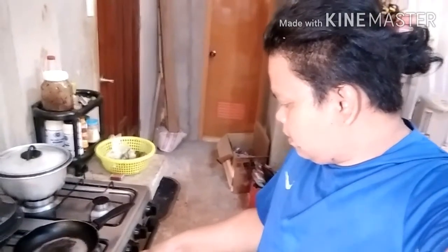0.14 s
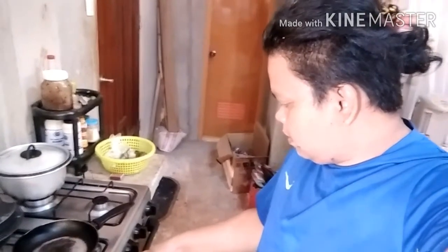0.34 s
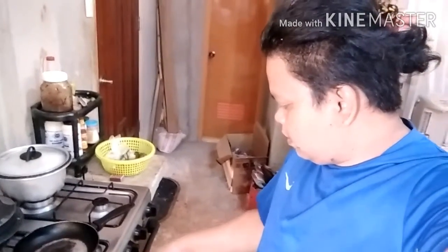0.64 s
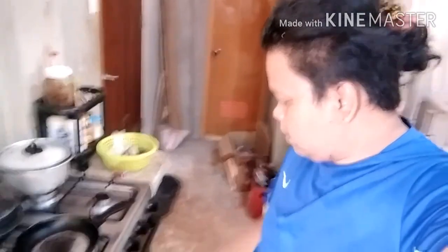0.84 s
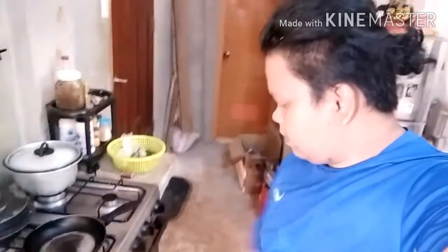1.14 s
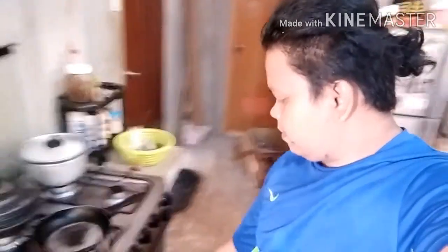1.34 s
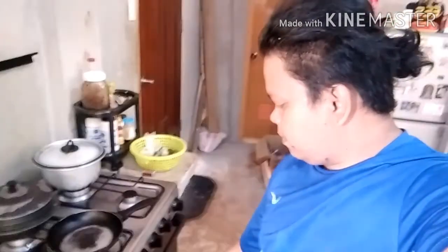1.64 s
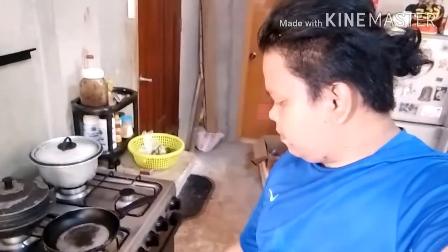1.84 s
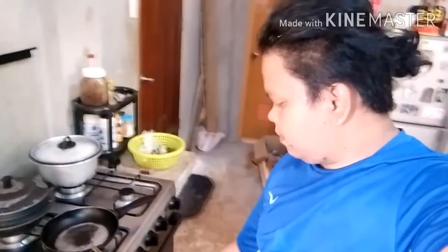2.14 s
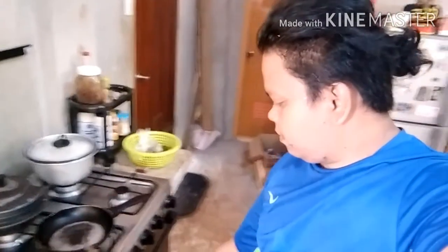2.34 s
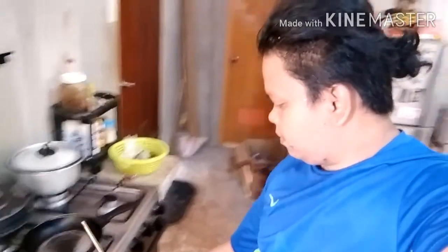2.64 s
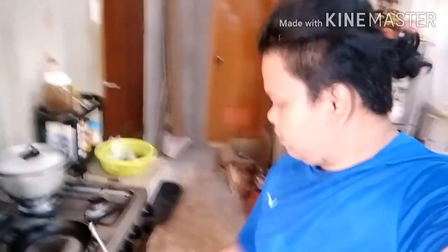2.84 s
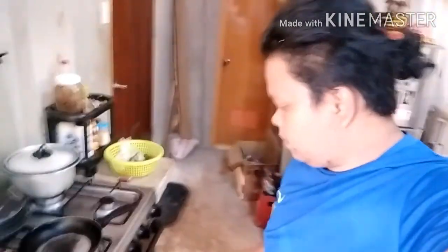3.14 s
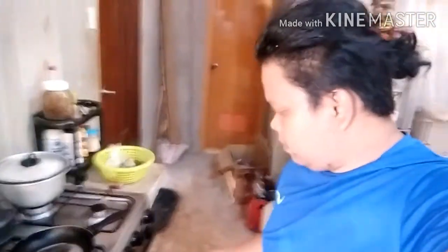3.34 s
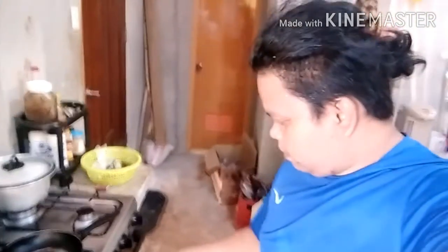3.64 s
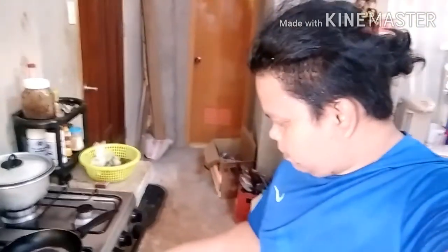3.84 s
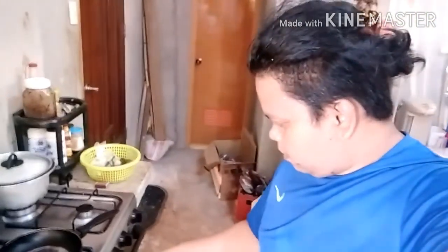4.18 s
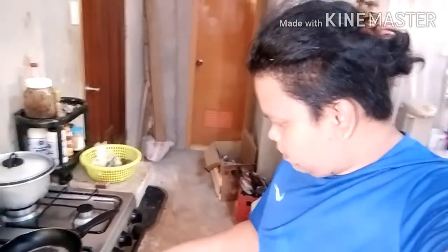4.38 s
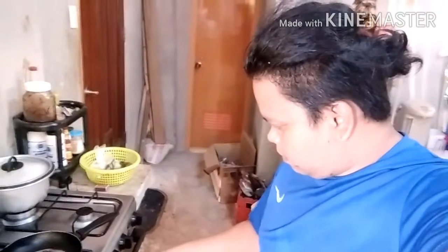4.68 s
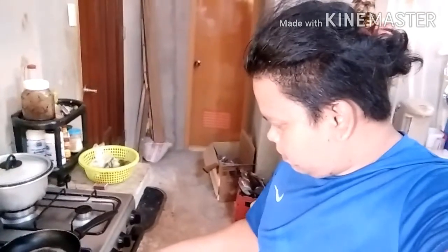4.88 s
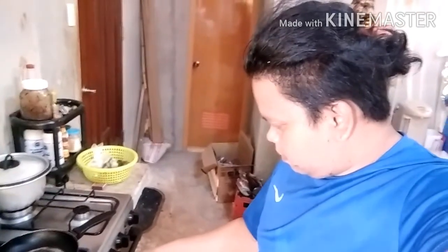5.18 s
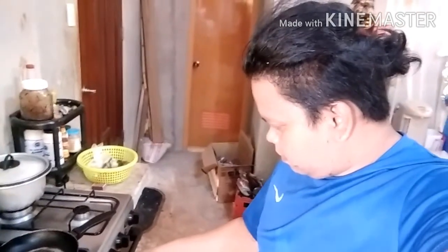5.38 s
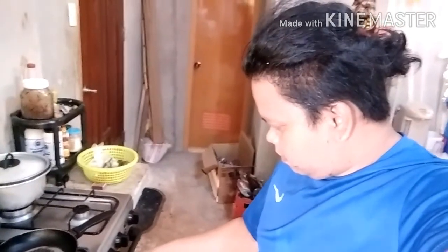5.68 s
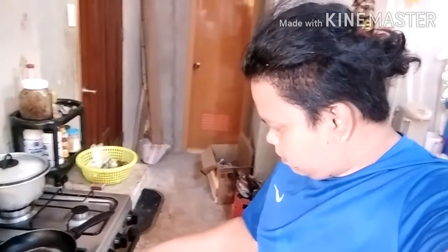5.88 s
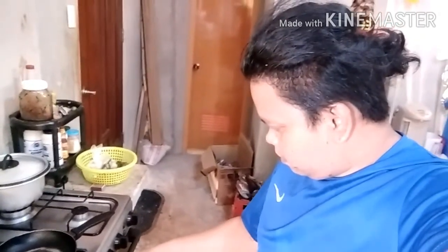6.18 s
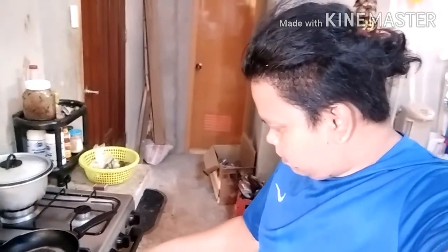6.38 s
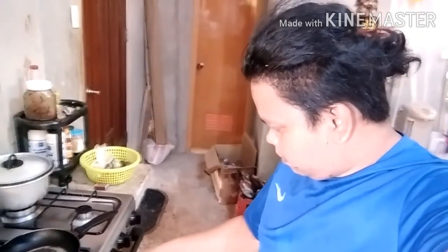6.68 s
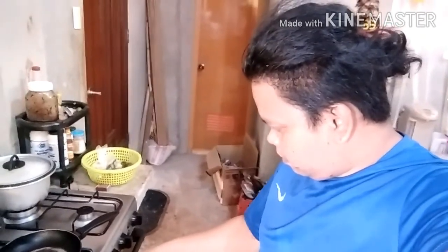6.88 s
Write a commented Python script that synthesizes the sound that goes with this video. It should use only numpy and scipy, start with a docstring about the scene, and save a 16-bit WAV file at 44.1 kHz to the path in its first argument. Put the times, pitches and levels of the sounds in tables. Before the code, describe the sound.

The echo of a lighter snap is already fading at the start. Loud, dry, clipped cracks with a brief midrange ring follow at about 0.1, 0.5 and 0.8 seconds, with a loose rattle at 0.6. The trigger clacks back firmly in a double hit at 1.0. Near silence follows, with a very faint thin whine around 1.7-2.1. Hollow knocks sound at 1.8, 2.35 and 2.9, the second with soft bumps; a hard, bright knock at 3.15 makes iron ring. A clack at 3.3 and small ticks and a scrape near 3.6 follow. Snaps return at 4.3, 5.7 with a dull thud, 6.25 and 6.7, among clacks, light clinks and short scrapes. A wavering whine swells faintly from 6.1 to 7. The bare kitchen answers briefly, its echo cut by a close phone's noise gate; low quiet air remains and no flame catches.

```python
"""A piezo gas lighter is snapped again and again at a stove burner in a bare, echoing kitchen; no flame catches.
The tail of one snap opens the scene and three more follow: noise cracks over ringing body partials.
The trigger clacks back. In the pause, coloured noise knocks, ringing iron and scrapes place the wand
about the pan supports, and a thin, wavering whine appears. Four last snaps follow, one with a dull thud.
A nearby phone clips the snaps, and its noise gate cuts the echo short over a quiet bed of filtered noise."""
import sys
import numpy as np
from scipy import signal
from scipy.fft import rfft, irfft
from scipy.io import wavfile
from scipy.ndimage import uniform_filter1d, minimum_filter1d

SR = 44100
rng = np.random.default_rng(int(sys.argv[2]) if len(sys.argv) > 2 else 0)


def store_wav(level_fs):
    """Save 16-bit WAV to argv[1]."""
    pcm = np.round(np.clip(np.atleast_2d(level_fs), -1, 1) * 32767)
    wavfile.write(sys.argv[1], SR, pcm.T.astype(np.int16))


N = 309582
HIT_T = np.arange(SR // 2) / SR  # time axis of one blow [s]

# colour of a small tick, also of the grit in a scrape: (frequency [Hz], level [dB])
TICK_COLOUR = [(100, -5.5), (900, -2.5), (1800, 2), (3000, -5.5), (6000, -19.5), (10000, -20.5),
               (15500, -37)]


def snaps(room):
    """The hammer hits the crystal: a noisy crack rings the body, and a short low thump, mostly dry, adds bass."""
    # hammer blows: (time [s], relative level [dB], bass [dB])
    snap_hits = [(-.25, 2, 6), (0.086, -2, -0.5), (0.4612, -0.5, -4), (0.7856, -2, -1), (4.302, -5, -1.5),
                 (5.699, -4, 1.5), (6.2537, -1.5, -4.5), (6.693, -2, -3.5)]
    # crack of the hammer: (frequency [Hz], level [dB])
    crack_colour = [(30, -21.5), (90, -10.5), (400, -12.5), (900, -16.5), (1300, -6), (1800, 5),
                    (2600, 4.5), (3200, -1), (4200, -1.5), (5500, -8), (7200, -13.5), (10000, -11),
                    (12500, -18), (15500, -27.5)]
    # lighter body: (frequency [Hz], relative level [dB], t60 [s])
    body_modes = [(1790, -15.5, 0.048), (1962, -1.5, 0.048), (2216, 2.5, .018), (3134, -2, .02),
                  (3430, -8, .02), (4570, -16.5, 0.02), (5520, -21, 0.018)]
    # low thump under each snap, with little echo: (frequency [Hz], relative level [dB], t60 [s])
    thump_modes = [(152, -4.5, 0.055), (392, 3.5, 0.015)]
    snap_db, thump_db, treble_db = 21, -13, 6
    out = np.zeros(N)
    for s, db, bass_db in snap_hits:
        crack = contact(crack_colour, t60=.022, chatter=1.1)
        snap = tone(crack + ring(body_modes), bass_db, treble_db)
        add(out, s, undb(snap_db + db) * snap, room, room_db=-11.5)
        thump = undb(snap_db + thump_db + db + bass_db) * ring(thump_modes)
        add(out, s, thump, room, room_db=-19.5)
    return out


def clacks(room):
    """Trigger and plunger slide and clack: a rattle, a ringing plunger and a jolt to the hob."""
    # blows: (time [s], relative level [dB], bass [dB], treble [dB], hob ring against the clack [dB])
    clack_hits = [(0.6041, -9.5, 4, -4, -7), (1.0002, -1.5, -1.5, 5, -12), (1.0453, -4.5, -1, -1, -10.5),
                  (3.3212, -7.5, -2, 5.5, -11), (4.361, -8.5, -3.5, -2.5, -8.5),
                  (4.498, -6.5, 4.5, -1.5, -15), (5.8592, -10.5, 3.5, 5, -2), (6.844, -21.5, 8.5, 3, -4.5)]
    # colour of the rattle: (frequency [Hz], level [dB])
    clack_colour = [(40, -26), (100, -11.5), (250, -4.5), (390, -20.5), (520, 2), (700, -6.5), (1000, -4.5),
                    (1500, 5), (2500, 1.5), (4000, -6.5), (5500, -17.5), (9000, -17), (15500, -39.5)]
    # plunger: (frequency [Hz], relative level [dB], t60 [s])
    plunger_modes = [(2620, 0.5, 0.072), (3455, -10.5, 0.031), (4490, -8, 0.042)]
    # sheet metal of the hob: (frequency [Hz], relative level [dB], t60 [s])
    hob_modes = [(561.7, -6.5, 0.24), (559, -2, 0.43), (663, 1, 0.13), (760, -2.5, .18), (863, -5, .12)]
    clack_db = 20
    out = np.zeros(N)
    for s, db, bass_db, treble_db, hob_db in clack_hits:
        # a firm release is short and rings the plunger; a gentle one rattles on and blends with its echo
        rattle = contact(clack_colour, t60=max(0.057 - .003 * db, .01), chatter=3.5)
        plunger = undb(-2 + 1.6 * db) * ring(plunger_modes)
        hob = undb(hob_db) * ring(hob_modes)
        clack = tone(rattle + plunger, bass_db, treble_db) + hob
        add(out, s, undb(clack_db + db) * clack, room, room_db=-14.5 - 0.2 * db)
    return out


def ticks(room):
    """Small contacts of the latch and the wand; the brighter, the thinner."""
    # ticks: (time [s], relative level [dB], brightness [dB])
    tick_hits = [(0.2808, -27.5, 5.5), (0.643, -22, -2), (.7303, -32.5, -2.5), (0.9529, -23.5, 4.5),
                 (1.061, -15, -14), (1.577, -33, -12), (3.1538, -15.5, 10), (3.367, -21, -13),
                 (3.5819, -22.5, -1), (3.639, -19, -5.5), (4.535, -23, -7), (5.945, -20.5, -8.5),
                 (6.4494, -21.5, 0.5), (6.9014, -23, -8.5)]
    tick_db = 20.5
    out = np.zeros(N)
    for s, db, bright_db in tick_hits:
        tick = tone(contact(TICK_COLOUR, t60=0.014, chatter=0.79), -.5 * bright_db, bright_db)
        # faint ticks blend with their echo
        add(out, s, undb(tick_db + db) * tick, room, room_db=-10 - .3 * db)
    return out


def knocks(room):
    """Hollow knocks at the stove; a harder contact gives more treble and less bass."""
    # knocks: (time [s], relative level [dB], hardness [dB])
    knock_hits = [(1.8237, -14.5, 2), (2.3369, -23, 4), (2.3519, -14.5, -2.5), (2.9333, -10, 4),
                  (3.1547, -8.5, 14)]
    # colour of a knock: (frequency [Hz], level [dB])
    knock_colour = [(40, -27), (130, -10.5), (300, -16), (520, -14.5), (680, -10.5), (1000, -11),
                    (1600, -3.5), (2300, -8.5), (3200, -22), (5000, -35.5), (9000, -49.5), (15500, -52)]
    knock_db = 19.5
    out = np.zeros(N)
    for s, db, hard_db in knock_hits:
        knock = tone(contact(knock_colour, t60=0.036, chatter=1.0), -1.44 * hard_db, hard_db)
        # firm knocks stand out more from their echo
        add(out, s, undb(knock_db + db) * knock, room, room_db=-14.5 - .7 * db)
    return out


def clinks(room):
    """The wand touches metal; the spot decides which partials sing."""
    # touches: (time [s], relative level [dB], favoured frequency [Hz])
    clink_hits = [(2.934, -38, 6300), (3.155, -7, 3346), (3.157, -26, 7700), (3.157, -12.5, 890),
                  (3.641, -21, 1450), (5.862, -30.5, 6900), (6.052, -22.5, 2000), (6.054, -26.5, 1110)]
    clink_db = 19
    out = np.zeros(N)
    for s, db, spot_hz in clink_hits:
        clink = undb(clink_db + db) * iron(spot_hz, reach=0.18)
        add(out, s, clink, room, room_db=-19, scattered=False)
    return out


def scrapes(room):
    """The wand drags over the iron: friction drives its partials and leaves some dry grit."""
    # strokes: (time [s], length [s], relative level [dB], favoured frequency [Hz])
    strokes = [(2.354, .18, -40, 5900), (3.654, .09, -23, 1480), (6.039, 0.062, -26, 2020),
               (6.228, .025, -28, 2050), (6.655, .035, -31, 1760)]
    scrape_db, grit_db = 19, -8
    out = np.zeros(N)
    for s, length_s, db, spot_hz in strokes:
        force = drag(length_s, slips_hz=23)
        ringing = signal.fftconvolve(force, iron(spot_hz, reach=.08))
        scrape = unit(waver(ringing))
        scrape[:len(force)] += undb(grit_db) * unit(colour(force, TICK_COLOUR))
        add(out, s, undb(scrape_db + db) * scrape, room, room_db=-3, scattered=False)
    return out


def bumps(room):
    """Soft low bumps of the stove's frame die within a few cycles; one snap shoves it with a dull thud."""
    # bumps: (time [s], relative level [dB], frequency [Hz])
    bump_hits = [(2.373, -20, 79.5), (2.483, -27, 81.6), (3.682, -32.5, 134)]
    bump_db, bump_cycles = 19, 7.1  # cycles until 60 dB down
    out = np.zeros(N)
    for s, db, hz in bump_hits:
        bump = undb(bump_db + db) * ring([(hz, 0, bump_cycles / hz)])
        add(out, s, bump, room, room_db=-2.5, scattered=False)
    thud_s, thud_db, thud_hz, thud_t60_s = 5.697, 12, 104, 0.014
    thud = undb(thud_db) * ring([(thud_hz, 0, thud_t60_s)])
    add(out, thud_s, thud, room, room_db=-30.0, scattered=False)
    return out


def whine(room, count=64):
    """A thin tone, unsteady in pitch and level, that swells and fades."""
    # tones: (time [s], length [s], level [dB], frequency [Hz])
    whine_notes = [(1.69, .46, -52.5, 1704), (3.801, .45, -66, 1710), (6.078, 0.98, -44, 1773)]
    wavers_hz, flicker_db = 20, 2
    out = np.zeros(N)
    for s, length_s, db, hz in whine_notes:
        t = np.arange(int(length_s * SR)) / SR
        flicker = np.interp(t * wavers_hz, np.arange(count), rng.standard_normal(count))
        note = waver(np.sin(2 * np.pi * hz * t), bend=.009, rate_hz=wavers_hz)
        note = note * signal.windows.tukey(len(t), .25)
        add(out, s, undb(db + flicker_db * flicker) * note, room, room_db=-6, scattered=False)
    return out


def hush(db=-55):
    """The quiet air of the house: steady noise, strongest in the bass."""
    # colour of the air: (frequency [Hz], level [dB])
    air_colour = [(18, -56), (30, -24.5), (53, -9), (129, -1.5), (260, -10.5), (304, -4.5), (404, -17.5),
                  (1000, -20.5), (1730, -16), (2080, -22), (2560, -21.5), (15000, -46.5)]
    air = unit(colour(rng.standard_normal(N), air_colour))
    return undb(db) * np.sqrt(N) * air


def kitchen(build_s=0.015, count=14):
    """The direct path with its early echoes, and a diffuse tail with its own decay in each band."""
    # early echoes: (delay [s], gain)
    early_echoes = [(.0026, 0.16), (.0043, 0.12), (0.0189, 0.044), (0.0505, 0.034)]
    # reverberation: (frequency [Hz], t60 [s])
    room_decay = [(100, 1), (500, 0.66), (2000, 0.43), (5000, 0.53), (10000, 0.38), (15000, 0.1)]
    # colour of the tail: (frequency [Hz], level [dB])
    room_colour = [(40, -17.5), (80, -4), (170, -1), (230, -3), (400, -1), (570, 0.5), (760, 5),
                   (1000, -1.5), (2000, 3.5), (5000, -2.5), (10000, 1), (15000, 1)]
    t = np.arange(SR) / SR
    near = np.zeros(SR)
    near[0] = 1
    for lag, gain in early_echoes:
        near[int(lag * SR)] += gain
    hz = np.arange(SR // 2 + 1)
    noise = rfft(rng.standard_normal(SR))
    centres = np.geomspace(80, 16000, count)
    tail = np.zeros(SR)
    for f, band in zip(centres, np.eye(count)):
        band_noise = irfft(noise * along(np.c_[centres, band], hz), SR)
        tail += band_noise * np.exp(-np.log(1000) * t / along(room_decay, f))
    build_up = 1 - np.exp(-t / build_s)
    return near, unit(colour(tail * build_up, room_colour))


def add(out, s, sound, room, room_db, scattered=True):
    """Let one sound happen in the kitchen at time s; unscattered sounds keep their exact colour in the echo."""
    near, tail = room
    sent = diffuse(sound) if scattered else sound
    heard = signal.fftconvolve(sound, near) + undb(room_db) * signal.fftconvolve(sent, tail)
    start = int(round(s * SR))
    heard = heard[max(-start, 0):]  # a sound from before the opening leaves only its tail
    start = max(start, 0)
    out[start:start + len(heard)] += heard[:len(out) - start]


def diffuse(x, count=48):
    """What the walls receive: summed over all directions, a blow keeps its broad colour, not its fine ripples."""
    hz = np.fft.rfftfreq(len(x), 1 / SR)
    power = np.abs(rfft(x)) ** 2
    edges = np.geomspace(30, 20000, count + 1)
    band = np.histogram(hz, edges, weights=power)[0] / np.histogram(hz, edges)[0]
    centres = np.sqrt(edges[1:] * edges[:-1])
    return colour(signal.unit_impulse(len(x)), np.c_[centres, 10 * np.log10(band + 1e-18)])


def contact(spectrum, t60, chatter):
    """One sharp push together with dying noise, the chatter of loose parts."""
    noise = rng.standard_normal(len(HIT_T))
    force = chatter * unit(noise * np.exp(-np.log(1000) * HIT_T / t60))
    force[0] += 1
    return unit(colour(force, spectrum))


def ring(modes):
    """Decaying sine partials; dB sets each one's energy relative to the others."""
    total = np.zeros(len(HIT_T))
    for hz, db, t60 in modes:
        decay = np.exp(-np.log(1000) * HIT_T / t60)
        total += undb(db) * unit(np.sin(2 * np.pi * hz * HIT_T) * decay)
    return unit(total)


def iron(spot_hz, reach):
    """Partials that answer at one spot of the iron, 6 dB weaker when reach octaves from the favoured pitch."""
    # pan supports and burner: (frequency [Hz], relative level [dB], t60 [s])
    iron_modes = [(882, -3, .25), (1023, -12, .25), (1550, -3, .25), (1680, -4, .05), (1775, -12, .25),
                  (2051, -12, .2), (2250, -6, .04), (3356, 1, .13), (5795, -18, .1), (7060, -22, .3),
                  (7320, -14, .22), (9200, -12, .12)]
    return ring([(hz, db - 6 * (np.log2(hz / spot_hz) / reach) ** 2, t60) for hz, db, t60 in iron_modes])


def drag(length_s, slips_hz):
    """Friction: grains of force in uneven spurts, swelling and fading over one stroke."""
    t = np.arange(int(length_s * SR)) / SR
    wobble = np.interp(t * slips_hz, np.arange(64), rng.standard_normal(64))
    spurts = np.sin(np.pi * (slips_hz * t + 0.16 * wobble)) ** 4
    grains = rng.standard_normal(len(t))
    return unit(grains * spurts * signal.windows.tukey(len(t), .3))


def waver(x, bend=0.011, rate_hz=22):
    """Bend the pitch a little at random, as changing pressure on a contact does."""
    n = np.arange(len(x))
    pressure = np.interp(n / SR * rate_hz, np.arange(128), rng.standard_normal(128))
    return np.interp(np.cumsum(1 + bend * pressure), n, x)


def tone(x, bass_db, treble_db):
    """Make a blow fuller or brighter."""
    return colour(x, [(600, bass_db), (1300, 0), (2500, 0.0011), (6000, treble_db)])


def colour(x, points, size=2048):
    """Causal minimum-phase filter with the given (frequency [Hz], level [dB]) response."""
    hz = np.arange(size // 2 + 1) * SR / size
    cepstrum = irfft(along(points, hz) * np.log(10) / 20)
    # fold the cepstrum so that the response starts at once
    cepstrum[1:size // 2] *= 2
    cepstrum[size // 2 + 1:] = 0
    response = irfft(np.exp(rfft(cepstrum)))
    return signal.fftconvolve(x, response)[:len(x)]


def along(points, hz):
    """Read (frequency [Hz], value) points on a log-frequency axis."""
    f, value = np.transpose(points)
    return np.interp(np.log(hz + 1), np.log(f), value)


def undb(db):
    """Decibels to gain."""
    return 10 ** (np.asarray(db) / 20)


def unit(x):
    """Scale to an energy of one."""
    return x / np.sqrt(np.sum(x ** 2) + 1e-18)


def scene():
    """Lighter, stove, whine and quiet air in one kitchen."""
    room = kitchen()
    lighter = snaps(room) + clacks(room) + ticks(room)
    stove = knocks(room) + clinks(room) + scrapes(room) + bumps(room)
    return (lighter + stove + whine(room) + hush())[None]


def gate(x, threshold_db=-42, depth_db=10, window_s=0.0086, hold_s=0.015):
    """Turn the sound down abruptly once its level has stayed under the threshold for the hold time."""
    power = np.abs(uniform_filter1d(x ** 2, int(window_s * SR)))
    level_db = 10 * np.log10(power + 1e-12)
    hold = int(hold_s * SR)
    # the shifted minimum looks back over the hold time
    shut = minimum_filter1d(1. * (level_db < threshold_db), hold, origin=(hold - 1) // 2)
    return x * undb(-depth_db * uniform_filter1d(shut, size=400))


def record(dry, low_hz=54, top_hz=15500):
    """The phone thins the lowest bass, gates the quiet, clips the snaps and cuts the top."""
    thinned = signal.sosfilt(signal.butter(4, low_hz, "high", fs=SR, output="sos"), dry)
    clipped = np.clip(gate(thinned), -1, 1)
    return signal.sosfilt(signal.ellip(8, .2, 70, top_hz, fs=SR, output="sos"), clipped)


dry = scene()
out = record(dry)
store_wav(out)
```